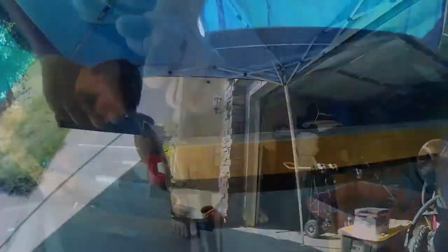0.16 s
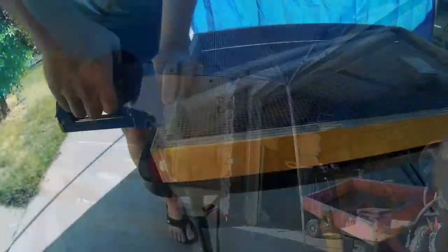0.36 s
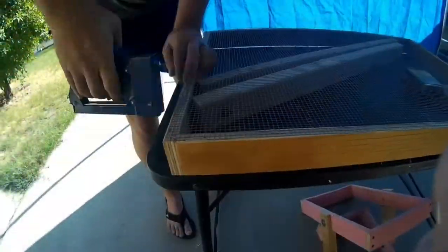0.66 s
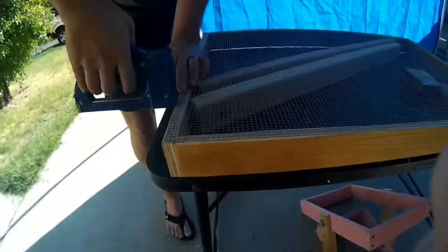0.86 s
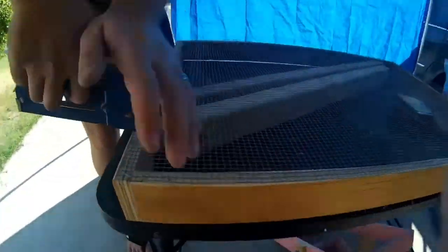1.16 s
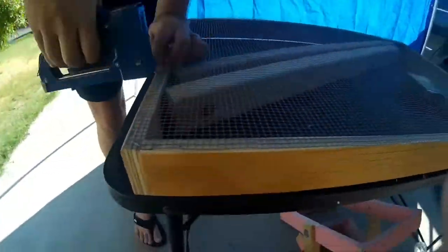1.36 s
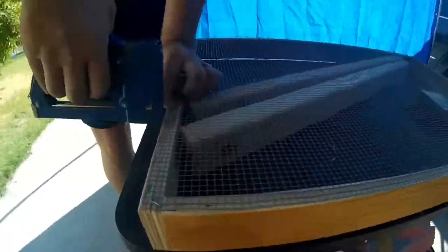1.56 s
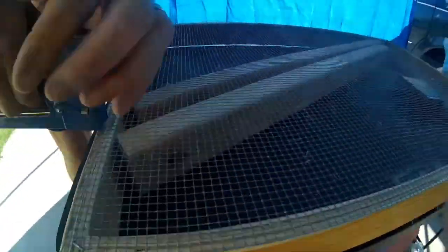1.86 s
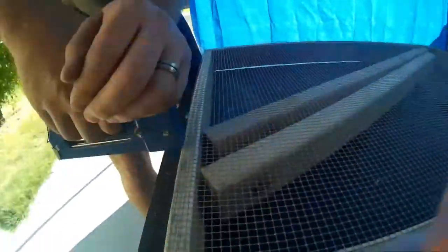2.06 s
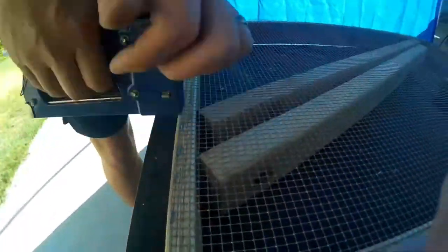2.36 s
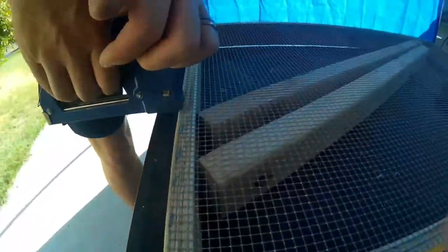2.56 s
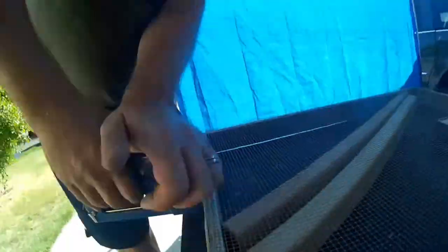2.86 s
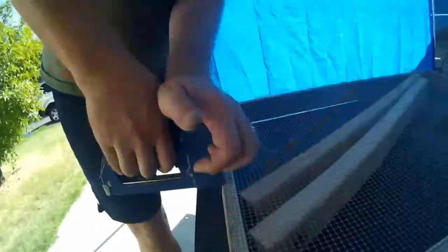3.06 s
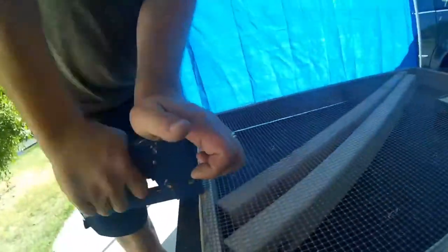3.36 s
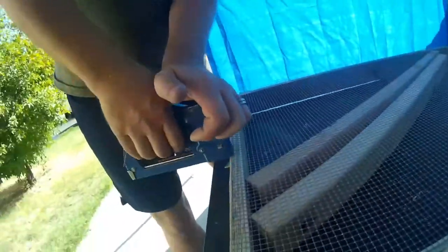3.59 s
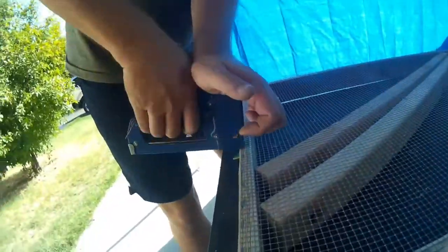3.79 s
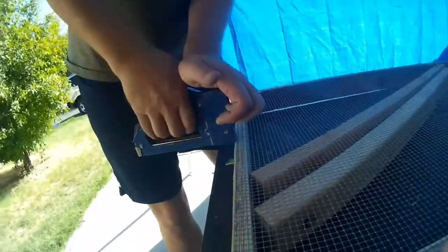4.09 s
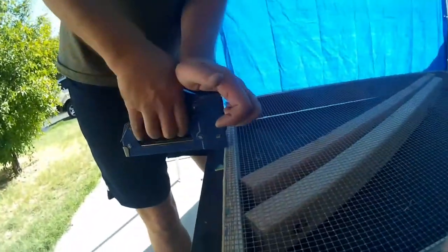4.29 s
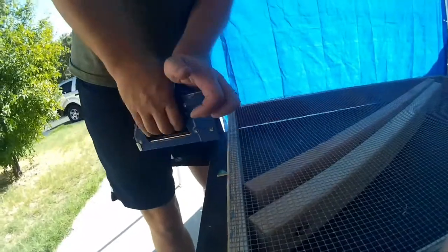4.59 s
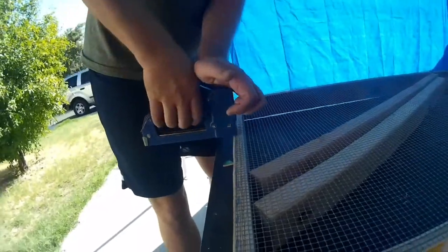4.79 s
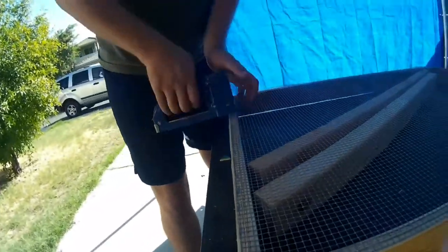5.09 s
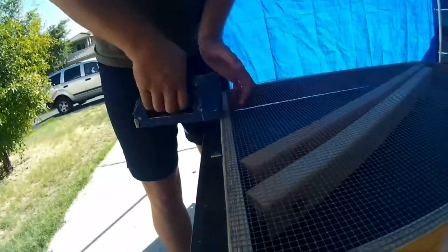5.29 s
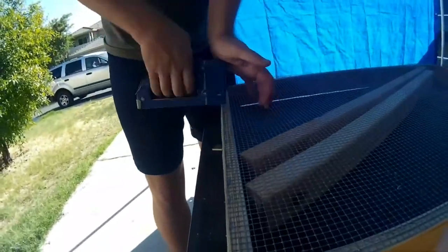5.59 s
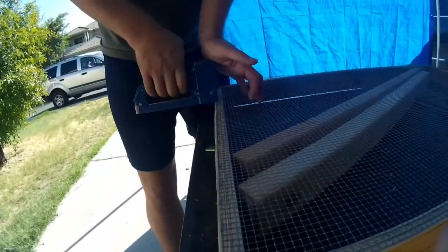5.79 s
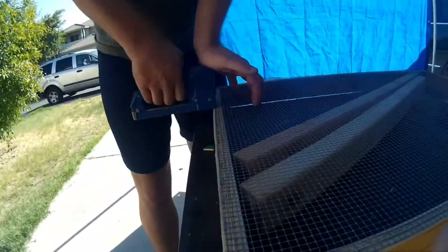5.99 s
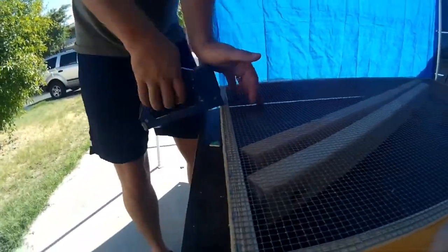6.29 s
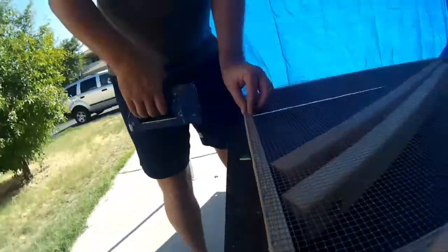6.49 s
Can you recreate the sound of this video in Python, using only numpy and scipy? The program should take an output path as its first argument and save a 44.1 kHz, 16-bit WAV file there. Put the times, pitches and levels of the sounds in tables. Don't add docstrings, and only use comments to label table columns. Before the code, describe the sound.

A hand staple gun fires eleven hard, dry snaps through wire mesh into a wooden frame, with small knocks and handle clicks between, outdoors.

```python
import sys
import numpy as np
from scipy import signal
from scipy.fft import rfft, irfft
from scipy.io import wavfile
from scipy.ndimage import uniform_filter1d

SR = 44100
rng = np.random.default_rng(int(sys.argv[2]) if len(sys.argv) > 2 else 0)


def ratio_of_db(decibels):
    return 10 ** (np.asarray(decibels, float) / 20)


def wav_out(sig):
    wavfile.write(sys.argv[1], SR, np.round(np.clip(np.atleast_2d(sig).T, -1, 1) * 32767).astype(np.int16))


N = 293265

# (time [s], blow level [dB], body frequency [Hz], steel crack level [dB], table shove level [dB])
SHOTS = [(0.231, -3, 1080, -17.5, -29.5), (0.676, -2, 1120, -18.5, -27.5), (1.3396, -0.5, 1069, -15, -49),
         (1.9114, -3, 1137, -15.5, -50), (2.405, -16, 1460, -14, -26), (2.882, -2.5, 1116, -12, -50),
         (3.457, -2.5, 1129, -17.5, -34), (3.997, -2, 1122, -14.5, -18.5), (4.581, -6, 1193, -15, -23),
         (5.039, -2.5, 1210, -11, -27), (5.611, -8, 1150, -21, -31.5)]
# (thump frequency [Hz], thump level [dB], plank frequency [Hz], plank level [dB], nose frequency [Hz])
SPOTS = [(175, -23.5, 700, -25, 1400), (186, -23, 720, -21, 3400), (196, -23, 1000, -23, 1900),
         (210, -21, 600, -27, 4700), (196, -17, 890, -17.5, 2470), (187, -18.5, 670, -19.5, 2800),
         (194, -22, 556, -19, 1800), (175, -27, 270, -16, 1600), (220, -27, 310, -13, 1700),
         (250, -23.5, 321, -11.5, 1850), (217, -23, 577, -19.5, 1730)]
# (latch lead [s], latch level [dB], driver travel [s], top snap level [dB], nose level [dB])
LATCHES = [(0.0055, -27, 0.0016, -21.5, -11.5), (0.0083, -28, 0.0015, -22.5, -20.5),
           (.006, -31, 0.0018, -25.5, -18.5), (0.0052, -35, 0.002, -27.5, -23),
           (0.0045, -28, 0.0032, -23, -21.5), (0.0048, -30.5, .002, -22.5, -18),
           (0.0052, -33, .0018, -28, -23), (0.0052, -36, .0022, -27.5, -28),
           (0.0061, -32.5, 0.0021, -26.5, -15.5), (0.004, -24, .0017, -24.5, -8.5),
           (0.011, -25.5, .0016, -28, -10.5)]
# (frequency [Hz], level [dB], wood lag [s])
EDGES = [(5500, -26, .0011), (5750, -20, .0008), (4511, -21, .0021), (4300, -19, .0024), (2900, -19, .0017),
         (3100, -21, .003), (3130, -24, .0018), (4370, -17, .0016), (3960, -17, .003), (4344, -17, .0015),
         (3725, -24, .003)]
# (rail frequency [Hz], level [dB], t60 [s], neighbour frequency [Hz], level [dB])
RAILS = [(414, -20.5, 0.08, 335, -30.5), (420, -22.5, 0.098, 342, -23.5), (405, -19.5, 0.1, 330, -27),
         (412, -26, .08, 360, -28), (437, -23.5, 0.097, 643, -22), (424, -23.5, 0.082, 592, -19.5),
         (429.6, -24, 0.073, 320, -23.5), (416, -19.5, 0.083, 690, -25.5), (435, -19.5, .06, 215, -34),
         (430, -26, 0.076, 530, -24), (430.5, -26, .1, 356, -18.5)]
# (low frequency [Hz], level [dB], high frequency [Hz], level [dB])
GRIPS = [(1850, -17, 2804, -11), (1900, -12, 2395, -12), (2200, -14, 3246, -13), (2169, -17, 3628, -15),
         (1930, -23.5, 3500, -17), (2080, -14, 4015, -12), (2625, -14, 3610, -14.5), (2385, -15, 4100, -12),
         (2406, -18, 3600, -13), (2660, -14, 3676, -14.5), (2300, -26, 3305, -16)]

# (frequency [Hz], level [dB], t60 [s])
BODY_MODES = [(2435, -3, 0.006), (4276, -11, 0.0069), (5220, -13.5, 0.0053), (2836, -8.5, 0.0079)]
# (frequency [Hz], density [dB per Hz])
SNAP_SPECTRUM = [(2940, -30.5), (5000, -4.5), (6550, -6.5), (10100, -2.5), (11200, -8.5), (12500, -15),
                 (15100, -22.5), (16500, -37)]
# (frequency [Hz], level [dB], t60 [s])
BOARD_MODES = [(646, -8.5, 0.015), (866, -6, 0.032), (1260, -10, 0.03)]
# (frequency [Hz], density [dB per Hz])
RATTLE_SPECTRUM = [(350, -29.5), (600, -4.5), (697, -7), (1310, -9), (1720, -15.5), (2910, -23.5),
                   (4400, -29), (6570, -45), (12000, -49), (15600, -79), (22000, -120)]
# (frequency [Hz], t60 [s])
RATTLE_T60 = [(500, 0.023), (1200, 0.033), (2500, 0.039), (5000, 0.038), (10000, 0.016)]
# (frequency [Hz], density [dB per Hz])
SHIVER_SPECTRUM = [(71, -33), (120, -0.5), (482, -1), (658, -13.5), (975, -4.5), (3120, -27.5),
                   (3500, -26.5), (3990, -33), (6000, -46), (7800, -75), (13200, -120)]

# (time [s], level [dB], upper coil level above [dB])
SPRINGS = [(0.711, -71.5, -9), (1.385, -68, -9), (1.413, -72, -11), (1.945, -66.5, -14), (1.996, -80, 8),
           (2.435, -59, -12), (2.497, -61, -18), (2.94, -62, -18), (3.475, -62, -7.5), (3.525, -65, -9),
           (4.045, -61, -15), (4.61, -70, -2), (4.663, -70, -9), (5.098, -67, -18), (5.668, -66, -9),
           (5.7, -79, 10)]
COIL_HZ = (3560, 3430, 4390)
# (time [s], level [dB], ring frequency [Hz], bright level above [dB])
CLICKS = [(0.306, -29.5, 1460, -19), (0.733, -36.5, 1340, -18), (0.758, -28.5, 1580, -6.5),
          (1.124, -21, 1474, -11.5), (1.136, -40, 1550, -27.5), (1.412, -31, 1350, -14.5),
          (1.996, -30.5, 1370, -16), (2.4974, -22.5, 1170, -21), (2.937, -42, 1415, -13.5),
          (2.962, -38.5, 2040, -23), (3.14, -40, 2450, -15), (3.519, -33, 1220, -28.5),
          (3.53, -38, 1160, -25.5), (4.044, -37, 1430, -25), (4.661, -34, 1550, -16),
          (5.088, -44, 1160, -8), (5.099, -39, 1394, -18), (5.666, -43, 1196, -17), (5.698, -42, 1800, -23)]
# (time [s], level [dB], ring frequency [Hz], bright level above [dB], t60 [s])
KNOCKS = [(0.021, -47, 1150, -31, 0.034), (0.172, -33.5, 1320, -15, 0.05), (0.321, -34.5, 1260, -18, 0.02),
          (0.439, -46.5, 1080, -23, 0.024), (0.512, -39.5, 1150, -7.5, 0.067),
          (0.545, -36.5, 1346, -32, 0.064), (0.835, -39, 1250, -35, 0.041), (1.272, -55, 2300, -14, 0.027),
          (1.641, -42, 950, -26, 0.04), (2.134, -50, 1070, -7.5, 0.014), (2.59, -51.5, 1100, -21.5, 0.031),
          (2.779, -51.5, 980, -12, 0.026), (2.8395, -43, 1430, -10, 0.014), (2.848, -45, 1443, -12, 0.028),
          (3.115, -36.5, 1080, -14.5, 0.01), (5.406, -51, 1080, -22.5, 0.028),
          (6.641, -51.5, 1176, -23, 0.07)]
# (time [s], level [dB], ring frequency [Hz], bright level above [dB], t60 [s])
TAPS = [(0.264, -32, 1370, -14.5, 0.043), (0.371, -31, 1166, -12.5, 0.051),
        (1.093, -44.5, 1204, -15, 0.041), (1.153, -44.5, 1460, -36, 0.049), (1.196, -46, 2200, -38, 0.03),
        (1.618, -35.5, 1063, -30, 0.041), (2.826, -20.5, 1150, -19.5, 0.015),
        (2.832, -33, 1410, -19, 0.037), (2.917, -34, 1080, -25, 0.03), (2.9235, -27, 1150, -12.5, 0.027),
        (2.928, -28.5, 2150, -7, 0.021), (3.397, -43, 1115, -16.5, 0.06), (3.506, -40, 1150, -28, 0.044),
        (6.1555, -36.5, 1608, -40, 0.028), (6.256, -58, 1210, -16, 0.04), (6.285, -37, 1320, -17, 0.076),
        (6.27, -49, 1240, -30, .06), (.525, -39, 1470, -18, 0.031), (.608, -50.5, 1500, -8.5, 0.016),
        (6.3155, -27, 1050, -13, 0.03), (6.33, -43, 1070, -19, 0.045), (6.357, -32, 1075, -32.5, 0.023),
        (6.6, -55, 1300, -22, 0.04)]
CLACK_S = (6.1555, 6.314)
# (frequency [Hz], level [dB], t60 [s])
CLACKS = [
    [(1150, -28, 0.017), (1550, -30, 0.014), (1930, -29.5, 0.019)],
    [(1000, -14, 0.011), (1436, -16, 0.012), (1970, -20.5, 0.014), (3240, -29.5, 0.011), (4460, -36.5, .01),
     (282, -40, 0.032)],
]
# (time [s], frequency [Hz], level [dB], t60 [s])
CHINKS = [(.265, 2300, -38, 0.013), (.294, 2000, -48, .012), (.306, 2900, -46, .01),
          (.371, 2900, -39, .015), (0.37, 4300, -50, .012), (.511, 1900, -43, .015),
          (.514, 3900, -48, .015), (.524, 4200, -54, .012), (.558, 2600, -50, .012),
          (.644, 2300, -48, .012), (1.196, 1790, -43, 0.017), (1.196, 2350, -48, .015),
          (1.972, 3100, -55, 0.0091), (1.987, 2800, -53, .01), (1.997, 2990, -41, .014),
          (1.996, 10200, -48, 0.0098), (1.996, 8600, -54, 0.0087), (2.826, 3300, -40.5, 0.011),
          (2.826, 4100, -42, .006), (2.832, 2200, -40, .007), (2.832, 4800, -48, .006),
          (2.84, 4300, -50, .007), (2.847, 2600, -42, .007), (2.937, 3100, -50, .015),
          (2.962, 3030, -40, 0.014), (2.962, 1500, -40, 0.014), (3.141, 1500, -44, 0.011),
          (3.14, 4630, -53, .01), (4.661, 2300, -43, 0.014), (4.661, 3500, -51, .012),
          (5.598, 2600, -41, .01), (5.668, 5000, -58, .01), (6.1555, 700, -39, .015),
          (6.285, 1850, -38, .012), (6.285, 742, -45, .015), (6.299, 1500, -45, 0.017),
          (6.324, 1150, -43, .04), (6.356, 1900, -48, .015), (.758, 3100, -46, .008),
          (.836, 2050, -50, .012), (1.619, 2700, -50, .008), (1.642, 3100, -52, .008),
          (1.644, 200, -44, .04), (1.565, 550, -52, .03), (1.412, 2600, -48, .008), (3.99, 4400, -48, .008),
          (2.592, 450, -52, .02), (6.3145, 1200, -24, .012)]
# (time [s], length [s], level [dB])
CHATTER = [(.245, .09, -62), (.375, .05, -64), (.51, .03, -58), (.54, .05, -62), (.682, .04, -58),
           (.755, .03, -64), (1.35, .07, -64), (1.925, .075, -63), (2.83, .05, -60), (2.895, .04, -58),
           (4.01, .045, -64), (5.05, .05, -62), (5.62, .055, -62), (6.29, .025, -62)]
# (time [s], length [s], level [dB], centre frequency [Hz])
SCRAPES = [(.005, 0.041, -54.5, 523), (0.116, 0.13, -60.5, 1050), (0.266, 0.073, -56.5, 1030),
           (0.416, 0.044, -56, 270), (.51, 0.089, -52, 700), (0.529, 0.052, -65, 1900),
           (1.069, 0.056, -68, 2500), (0.634, 0.031, -54, 1180), (0.72, 0.066, -58.5, 915),
           (0.828, 0.035, -60, 1090), (1.049, 0.12, -57.5, 780), (1.392, 0.037, -58, 1140),
           (1.619, 0.037, -56, 1160), (1.634, 0.074, -59.5, 96), (1.902, 0.03, -54.5, 1310),
           (1.95, 0.1, -52.5, 443), (2.076, 0.1, -63, 465), (2.816, 0.012, -56, 1290),
           (2.824, 0.016, -47, 1400), (2.896, 0.051, -52, 805), (3.023, 0.13, -64, 467),
           (4.152, 0.17, -72, 714), (4.548, 0.035, -67, 980), (5.404, 0.039, -61.5, 112),
           (5.56, 0.043, -76.5, 1620), (6.092, 0.1, -65.5, 1090), (6.236, 0.043, -64.5, 1310),
           (6.32, 0.074, -60, 890), (6.626, 0.048, -64, 1350)]
SQUEAK_S = (.609, 2.09, 3.113, 3.155)
# (level [dB], start frequency [Hz], end frequency [Hz], length [s])
SQUEAKS = [
    (-35, 600, 460, .056),
    (-49, 520, 500, .015),
    (-41, 560, 570, .028),
    (-53, 540, 520, .015),
]

# (time [s], level [dB])
YARD_BUSTLE = [(0.0, 12), (0.15, 5), (0.28, 13.5), (0.39, 10.5), (0.552, 10), (0.7, 10), (0.909, 2.5),
               (1.11, 3), (1.299, 7), (1.63, 3.5), (2.331, 1), (2.52, 3.5), (2.899, 0.5), (3.58, 1),
               (4.441, -1), (6.1, 0), (6.3, 5.5), (6.65, -1)]
# (frequency [Hz], density [dB per Hz])
AIR_SPECTRUM = [(15, -44), (25, -10.5), (146, -3), (389, -14), (422, -10), (457, -10.5), (538, -13),
                (809, -15.5), (952, -16), (1700, -25.5), (2530, -29), (11600, -28.5), (15200, -30),
                (16100, -50)]


def evened(x):
    return x / np.sqrt(np.mean(x ** 2) + 1e-20)


def read(points, hz):
    f, value = np.transpose(points)
    return np.interp(np.log(hz + 1), np.log(f + 1), value)


def add(mix, s, sound):
    part = mix[max(round(s * SR), 0):][:len(sound)]
    part += sound[:len(part)]


def clock(length):
    return np.arange(round(length * SR)) / SR


def decay(t, t60):
    return ratio_of_db(-60 * t / t60)


def onset(t, rise):
    return 1 - np.exp(-t / rise)


def mode(t, hz, db, t60, rise=0.0001, phase=0):
    return ratio_of_db(db) * decay(t, t60) * onset(t, rise) * np.sin(2 * np.pi * hz * t + phase)


def scattered_modes(t, modes, stretch, rise):
    total = np.zeros(len(t))
    for hz, db, t60 in modes:
        scatter, phase = rng.uniform(.96, 1.04), rng.uniform(0, 2 * np.pi)
        total += mode(t, hz * scatter, db, stretch * t60, rise, phase)
    return total


def coloured(size, db_of_hz):
    hz = np.fft.rfftfreq(size, 1 / SR)
    return evened(irfft(rfft(rng.standard_normal(size)) * ratio_of_db(db_of_hz(hz)), size))


def band(hz, centre_hz, octaves):
    return np.maximum(-6 * (np.log2((hz + 1) / centre_hz) / octaves) ** 2, -90)


def filtered(x, extra, centre_hz, octaves):
    size = len(x) + extra
    hz = np.fft.rfftfreq(size, 1 / SR)
    return evened(irfft(rfft(x, size) * ratio_of_db(band(hz, centre_hz, octaves)), size))


def driver_blow(body_hz, travel_s):
    t = clock(.2)
    envelope = (1 - np.exp(-(t / 0.00035) ** 2)) * decay(np.maximum(t - travel_s, 0), 0.0024)
    return ratio_of_db(-1.5) * envelope * np.sin(2 * np.pi * body_hz * t)


def steel_crack(crack_db, snap_db):
    t = clock(.2)
    crack = scattered_modes(t, BODY_MODES, 1.3, 0.00038)
    snap = coloured(len(t), lambda f: read(SNAP_SPECTRUM, f)) * decay(t, .012) * onset(t, 0.00018)
    return ratio_of_db(crack_db - 3.5) * crack + ratio_of_db(snap_db) * snap


def latch_slip(db):
    t = clock(.2)
    grit = coloured(len(t), lambda f: band(f, 1700, 0.42)) * ratio_of_db(-7.5) * decay(t, .03) * onset(t, 0.00064)
    high = mode(t, 4400, -17.5, 0.0064, phase=rng.uniform(0, 2 * np.pi))
    return ratio_of_db(db) * (mode(t, 1250, 0, 0.024) + high + grit)


def frame_thump(hz, db):
    t = clock(.2)
    thump = mode(t, hz, db + 10.0, 0.029, rise=0.00084, phase=0.4) + mode(t, hz, db - 7.5, 0.032, rise=0.003)
    return thump + ratio_of_db(-18) * scattered_modes(t, BOARD_MODES, 1, 0.00024)


def spot(crack_db, push_db, plank_hz, plank_db, nose_hz, nose_db):
    t = clock(.1)
    push = ratio_of_db(push_db) * (t / 0.0069) * np.exp(1 - t / 0.0033)
    plank = mode(t, plank_hz, plank_db, 0.027, rise=0.00052)
    nose = mode(t, nose_hz, nose_db, .014)
    driver = mode(t, 3520 * rng.uniform(.94, 1.06), crack_db - 14.0, .009)
    return push + plank + nose + driver


def rail(hz, db, t60, near_hz, near_db):
    t = clock(.2)
    return mode(t, hz, db, t60, rise=0.0014) + mode(t, near_hz, near_db, 0.033, rise=.0007)


def grip(low_hz, low_db, high_hz, high_db):
    t = clock(.05)
    return mode(t, low_hz, low_db, .012, rise=.0004) - mode(t, high_hz, high_db, .009, rise=.0003)


def rattle():
    noise = coloured(8192, lambda f: read(RATTLE_SPECTRUM, f))
    hz, t, z = signal.stft(noise, SR, nperseg=128)
    damped = z * decay(t, read(RATTLE_T60, hz)[:, None])
    tail = signal.istft(damped, SR, nperseg=128)[1]
    return ratio_of_db(-21.5) * tail * onset(clock(len(tail) / SR), 0.00042)


def shiver():
    t = np.arange(8192) / SR
    noise = coloured(len(t), lambda f: read(SHIVER_SPECTRUM, f))
    return ratio_of_db(-34) * decay(t, 0.18) * onset(t, 0.00087) * noise


def squeeze():
    t = clock(0.065)
    swell_db = -390 * (t[-1] - t)
    return ratio_of_db(-60 + swell_db) * coloured(len(t), lambda f: band(f, 1500, 0.67))


def staple(mix, shot, place, release, edge, wood, steel):
    s, blow_db, body_hz, crack_db, push_db = shot
    thump_hz, thump_db, plank_hz, plank_db, nose_hz = place
    lead, latch_db, travel_s, snap_db, nose_db = release
    edge_hz, edge_db, lag = edge
    add(mix, s - .054, squeeze())
    add(mix, s - lead, latch_slip(latch_db))
    add(mix, s - .0014, mode(clock(.2), 1500, blow_db - 21.0, 0.0027))
    add(mix, s - .0003, ratio_of_db(blow_db) * driver_blow(body_hz, travel_s))
    add(mix, s + .0001, steel_crack(crack_db, snap_db))
    add(mix, s + .0004, mode(clock(.05), edge_hz, edge_db, .008, rise=.0003))
    add(mix, s + .0004, grip(*steel))
    add(mix, s + .00066, spot(crack_db, push_db, plank_hz, plank_db, nose_hz, nose_db))
    add(mix, s + lag, frame_thump(thump_hz, thump_db))
    add(mix, s + lag, rail(*wood))
    add(mix, s + .001, rattle())
    add(mix, s + .0036, shiver())


def spring(db, upper_db):
    t = clock(.3)
    drift = uniform_filter1d(uniform_filter1d(rng.standard_normal(len(t)), 150), 150)
    shake = 1 + .5 * evened(drift)
    levels_db = (0, -7.5, upper_db)
    coil = sum(mode(t, hz, level_db, 0.23, rise=.008) for hz, level_db in zip(COIL_HZ, levels_db))
    return ratio_of_db(db) * shake * coil


def tick(db, hz, bright_db, t60, dull_db):
    t = clock(0.15)
    ring = mode(t, hz, 6.1, 0.39 * t60, rise=0.00061)
    overtone = mode(t, 2.1 * hz, -13, .008, rise=.0005)
    grit = ratio_of_db(-9.5) * decay(t, t60) * coloured(len(t), lambda f: band(f, 1.215 * hz, 0.61))
    bright = ratio_of_db(bright_db) * decay(t, .5 * t60) * coloured(len(t), lambda f: band(f, 3700, 0.61))
    dull = ratio_of_db(dull_db) * decay(t, 2.3 * t60) * coloured(len(t), lambda f: band(f, 400, .9))
    return ratio_of_db(db) * (ring + overtone + (grit + bright + dull) * onset(t, 0.00049))


def clack(modes):
    return sum(mode(clock(.08), hz, db, t60, rise=0.0006) for hz, db, t60 in modes)


def chink(hz, db, t60):
    return mode(clock(.06), hz, db, t60, rise=0.00036)


def chatter(length, db):
    size = round(length * SR)
    chance, rarity, sign = rng.random((3, size))
    hit = chance < 2500 / SR
    height = ratio_of_db(-2.2 * np.log(rarity + 1e-4))
    clicks = hit * height * (sign - .5) * signal.windows.tukey(size, .5)
    return ratio_of_db(db) * filtered(clicks, 256, 2100, .6)


def scrape(length, db, hz):
    slips = rng.standard_normal(8192) * ratio_of_db(2.5 * rng.exponential(1, 128)).repeat(64)
    size = round(length * SR)
    slips = slips[:size] * np.hanning(size)
    octaves = .9 * (1000 / hz) ** .3
    return ratio_of_db(db) * filtered(slips, 512, hz, octaves)


def squeak(db, start_hz, end_hz, length):
    t = clock(length)
    hz = np.linspace(start_hz, end_hz, len(t))
    rub = 1 + 0.24 * evened(uniform_filter1d(rng.standard_normal(len(t)), size=200))
    envelope = ratio_of_db(db - 8 * t / length) * signal.windows.tukey(len(t), .2)
    return rub * envelope * np.sin(2 * np.pi * np.cumsum(hz) / SR)


def early_hiss():
    off_s, fade_s = 0.77, .03
    early = np.clip((off_s - np.arange(N) / SR) / fade_s, 0, 1)

    def thin(hz):
        return read(AIR_SPECTRUM, hz) + np.minimum(24 * np.log2((hz + 1) / 3000), 0)

    return early * ratio_of_db(-74.5) * coloured(N, thin)


def yard():
    frames, hz = N // 128 + 5, np.fft.rfftfreq(512, 1 / SR)
    real, imaginary, patches = rng.standard_normal((frames, 257, 3)).T
    patches = evened(uniform_filter1d(uniform_filter1d(patches, 6, 0), 8, 1))
    s, bustle_db = np.transpose(YARD_BUSTLE)
    low = 1 / (1 + (hz / 300) ** 4)
    high = 1 / (1 + (2800 / (hz + 1)) ** 4)
    layers = [  # (band, level at rest [dB], share of the bustle, lumpiness [dB], trim [dB])
        (low, -63.5, 1, 2.3, .2),
        (1 - low - high, -67.5, 0.93, 2.3, .3),
        (high, -73.5, .05, .3, 1.2)]
    out = np.zeros(N)
    for part, calm_db, follow, lumpy_db, trim_db in layers:
        weight = np.clip(part, 0, 1)[:, None]
        z = (real + 1j * imaginary) * weight * ratio_of_db(read(AIR_SPECTRUM, hz)[:, None] + lumpy_db * patches)
        layer = evened(signal.istft(z, nperseg=512, noverlap=384)[1][:N])
        level_db = np.interp(np.arange(N) / SR, s, calm_db + follow * bustle_db)
        out += layer * ratio_of_db(trim_db + level_db)
    return out


def scene():
    mix = yard() + early_hiss()
    for parts in zip(SHOTS, SPOTS, LATCHES, EDGES, RAILS, GRIPS):
        staple(mix, *parts)
    for s, db, upper_db in SPRINGS:
        add(mix, s, spring(db, upper_db))
    for s, *row in CLICKS:
        add(mix, s, tick(*row, t60=0.018, dull_db=-20))
    for s, *row in KNOCKS:
        add(mix, s, tick(*row, dull_db=-3))
    for s, *row in TAPS:
        add(mix, s, tick(*row, dull_db=-13))
    for s, modes in zip(CLACK_S, CLACKS):
        add(mix, s, clack(modes))
    for s, *row in CHINKS:
        add(mix, s, chink(*row))
    for s, *row in CHATTER:
        add(mix, s, chatter(*row))
    for s, *row in SCRAPES:
        add(mix, s, scrape(*row))
    for s, row in zip(SQUEAK_S, SQUEAKS):
        add(mix, s, squeak(*row))
    return mix[None]


def low_pass(x):
    return signal.sosfilt(signal.butter(12, 16600, fs=SR, output="sos"), x)


def record(dry):
    ceiling = 1.1
    overloaded = ceiling * np.tanh(dry / ceiling)
    mix = signal.lfilter(*signal.butter(1, 25 / (SR / 2), "high"), overloaded)
    return low_pass(mix)


dry = scene()
out = record(dry)
wav_out(out)
```